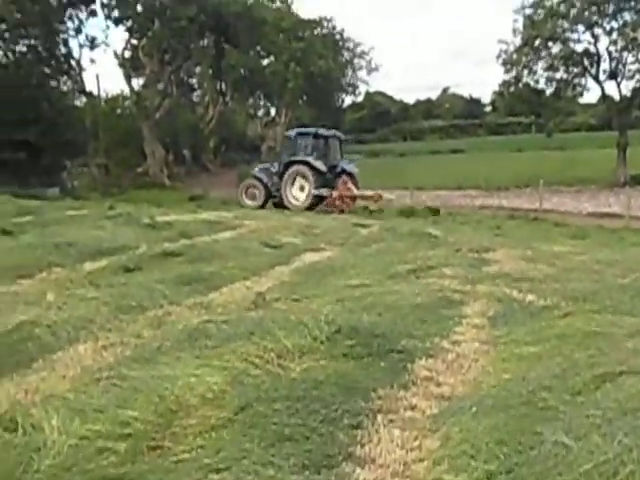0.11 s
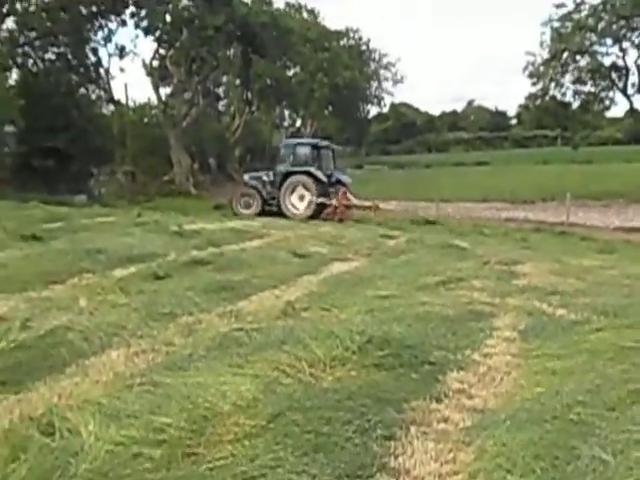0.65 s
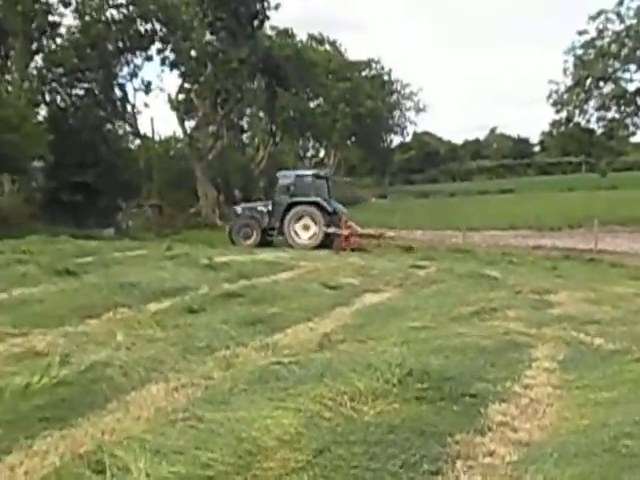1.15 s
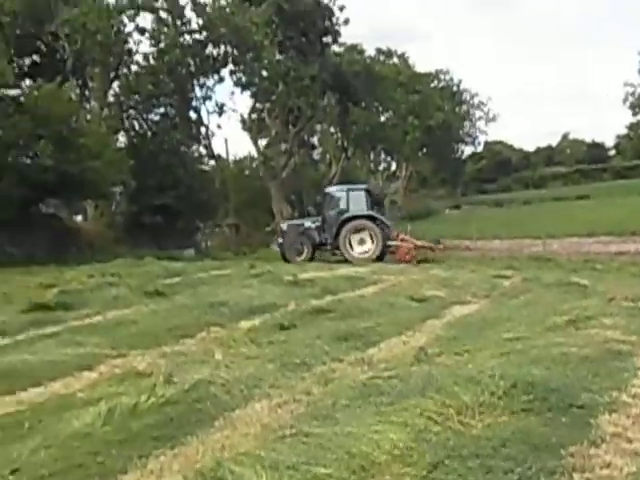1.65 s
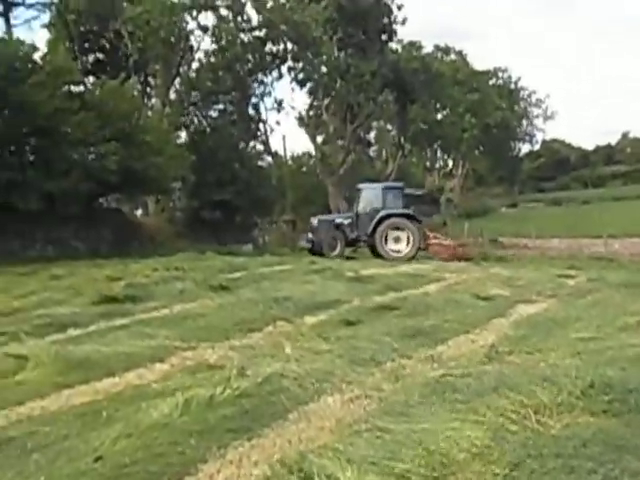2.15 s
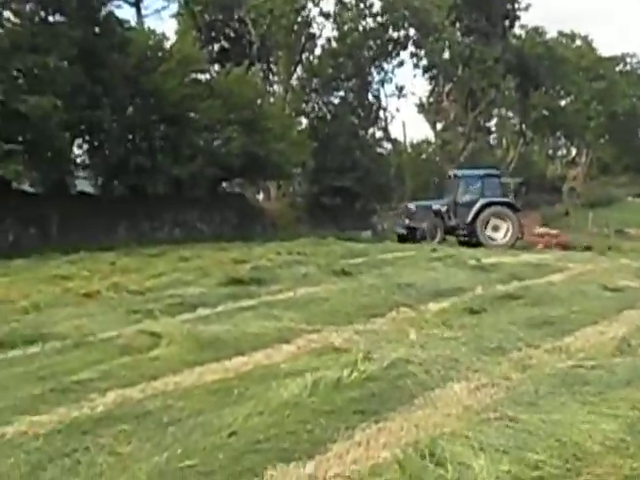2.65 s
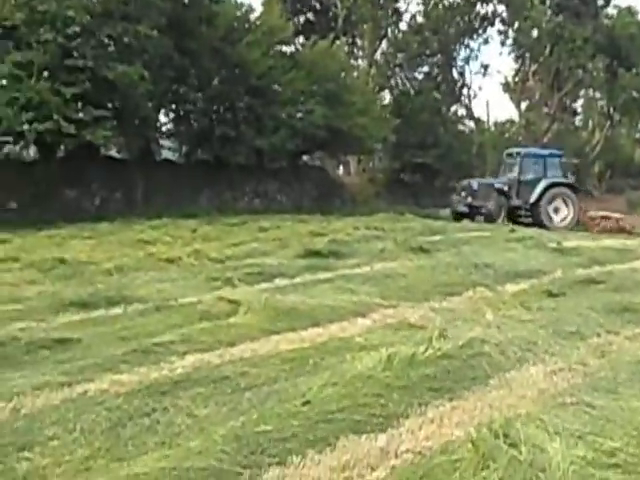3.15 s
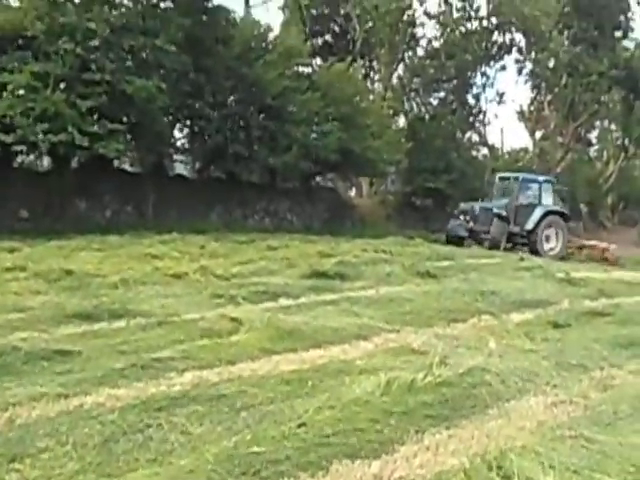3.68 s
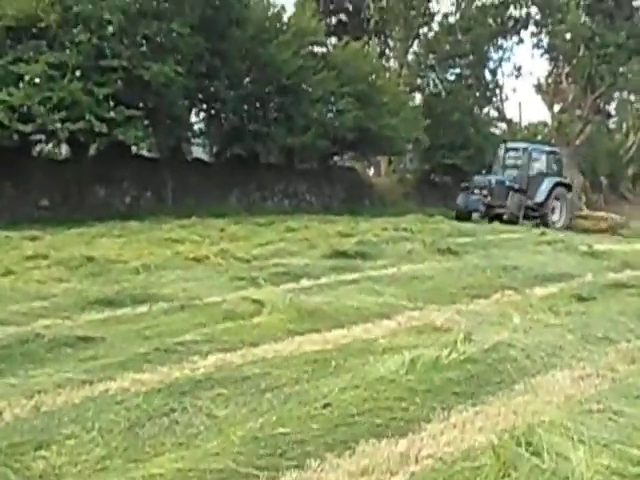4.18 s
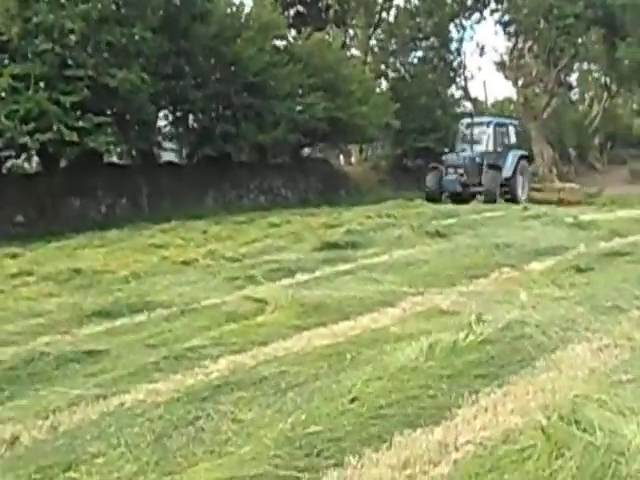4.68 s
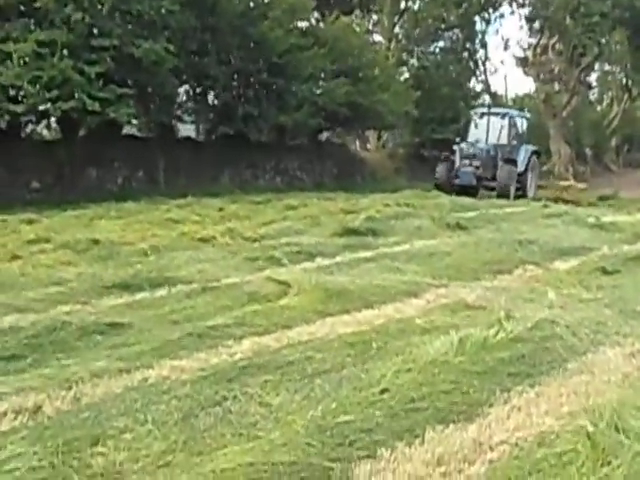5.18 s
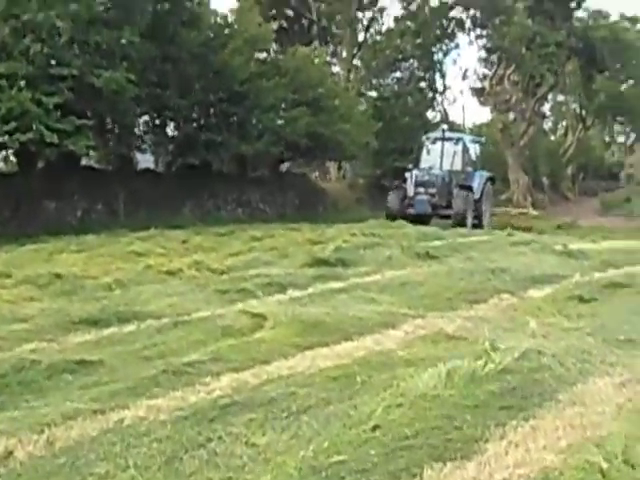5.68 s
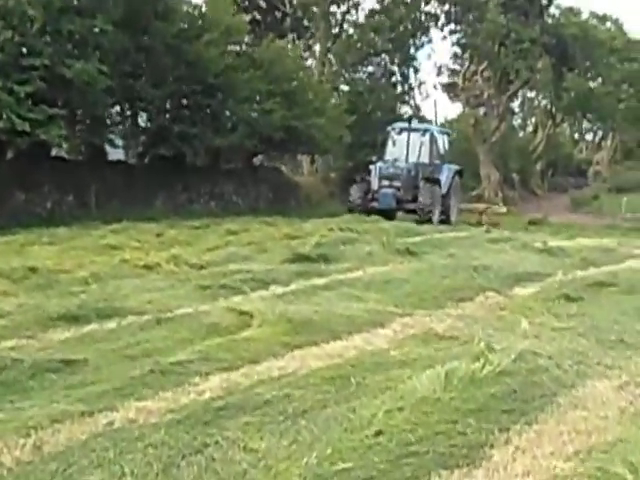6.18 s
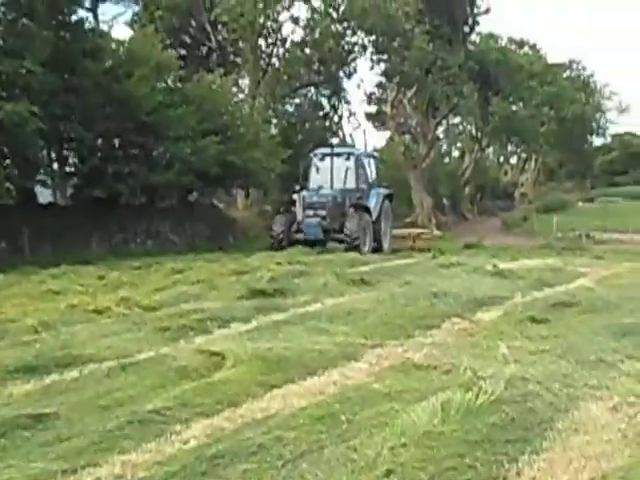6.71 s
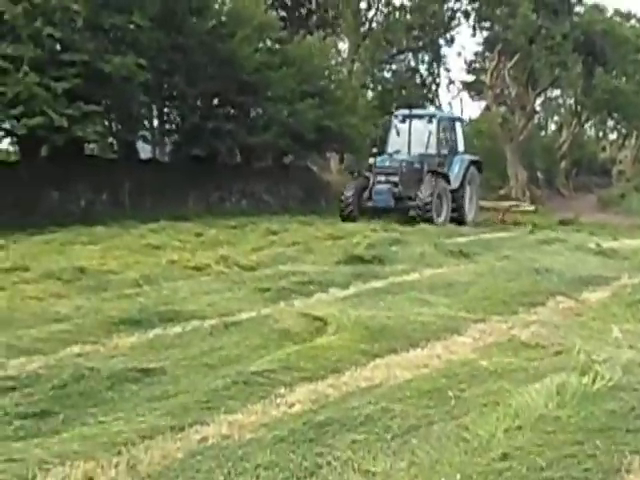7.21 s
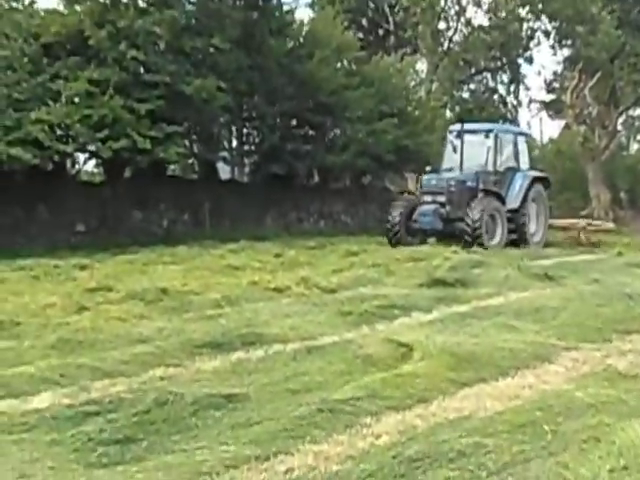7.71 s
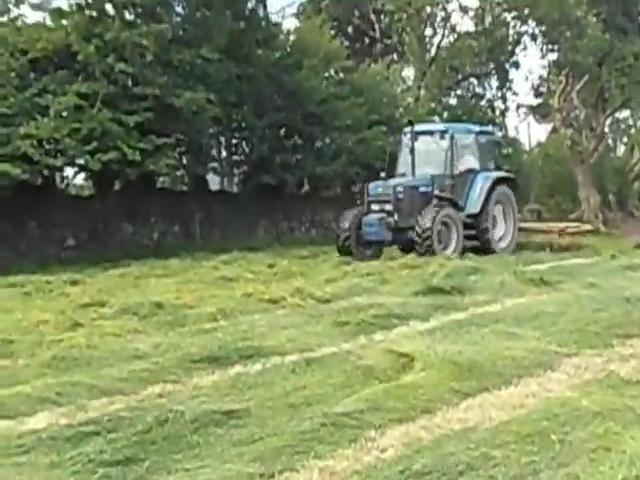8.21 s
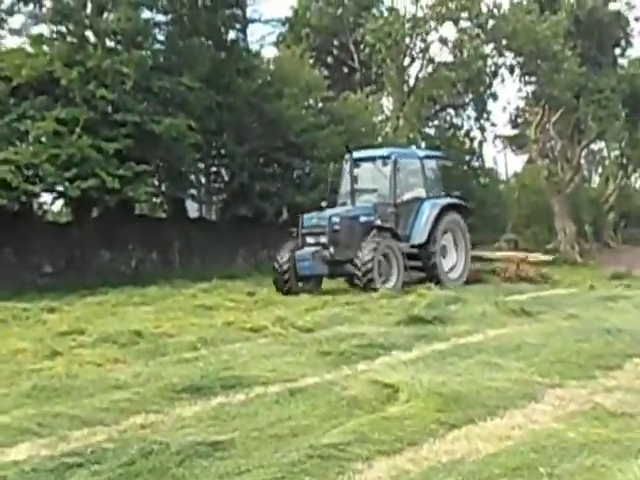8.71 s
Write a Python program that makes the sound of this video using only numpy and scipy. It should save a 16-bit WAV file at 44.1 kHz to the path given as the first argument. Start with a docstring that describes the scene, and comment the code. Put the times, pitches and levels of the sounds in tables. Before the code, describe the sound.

Wind blusters in irregular low thuds and flutter over a steady tractor engine. The engine slows in the first second, knocks along evenly, then quickens midway with a gearbox hum and swells as it approaches across the open field. Two faint squeaks come early, a bright double metal tick late, followed by a thin whine. Cheap handheld microphone, mono, band-limited, distorted by gusts.

```python
"""Tractor and hay machine in wind

A diesel tractor at the far end of a mown field turns, slows, then speeds up and draws nearer.
Firings drive exhaust tones and shaped noise in panel resonances; gears add hum, the hay machine whirr.
Steel clinks and squeaks are brief tones; gusty wind is coloured noise that rumbles and thumps on a
small microphone; the low-rate recorder keeps only a narrow band and clips."""
import sys
import numpy as np
from scipy import signal
from scipy.fft import rfft, irfft, next_fast_len
from scipy.io import wavfile
from scipy.ndimage import uniform_filter1d, map_coordinates

SR = 44100
rng = np.random.default_rng(int(sys.argv[2]) if len(sys.argv) > 2 else 0)


def invert_db(level):
    """Linear amplitude ratio for a level in decibels (20 dB per decade), elementwise."""
    return 10 ** (np.asarray(level, dtype=float) / 20)


def wav_out(sig):
    """Save sig, one row per channel (or a flat mono array), as 16-bit PCM at SR to the path in sys.argv[1]."""
    wavfile.write(sys.argv[1], SR, np.round(np.clip(np.atleast_2d(sig).T, -1, 1) * 32767).astype(np.int16))


N = 390285

# Wind strength. Each row: time in seconds, deep rumble in dB, flutter in dB.
WIND = [(0, -17.5, -25), (1.1, -30, -30.5), (1.9, -23.5, -29.5), (2.2, -33.5, -35), (2.7, -27.5, -31.5),
        (3.4, -27.5, -32), (3.95, -19, -23), (4.15, -35.5, -34.5), (4.45, -29, -36), (5.2, -24, -25),
        (5.45, -32, -32.5), (5.8, -34, -30), (6, -17, -18), (6.35, -23, -24.5), (6.6, -43.5, -30),
        (6.95, -18.5, -18.5), (7.3, -28.5, -25), (8.4, -25.5, -24), (8.85, -24.5, -20)]
# Loudest thumps of wind on the microphone. Each row: centre in seconds, level in dB,
# length in seconds, edge in dB relative to the thump.
THUMPS = [(0.051, -19, 0.0071, 5.5), (0.442, -8.5, 0.0082, -7.5), (0.468, -12.5, 0.03, -11.5),
          (0.502, -13, 0.012, -20), (0.679, -15.5, 0.015, -38), (0.776, -16.5, 0.013, -7),
          (0.914, -15, 0.011, -19), (1.323, -8.5, 0.017, -36), (1.571, -9, 0.021, -11.5),
          (1.657, -12.5, 0.02, -12.5), (1.752, -11, 0.0082, -25), (1.901, -3, 0.0061, -25),
          (2.141, -16.5, 0.016, -31), (2.449, -22, 0.014, -22), (2.555, -19.5, 0.017, -29),
          (2.717, -19.5, 0.011, -23), (2.907, -22, 0.017, -30), (3.095, -24, .012, -31),
          (3.406, -17, 0.018, -25), (3.518, -14.5, 0.0072, -25), (3.743, -10.5, 0.009, -17),
          (3.817, -14, 0.031, -14), (3.873, -14.5, 0.032, -6), (3.94, -10.5, 0.012, -13.5),
          (4.548, -18.5, 0.019, -21), (4.773, -11.5, 0.0093, -21), (4.81, -20.5, 0.0057, -3),
          (4.857, -12, 0.023, -18), (4.9, -14, 0.009, -7.5), (4.995, -19, 0.013, -19),
          (5.035, -24.5, 0.0093, -4), (5.103, -11, 0.012, -13.5), (5.141, -23, .008, -6),
          (5.19, -17.5, 0.02, -13), (5.413, -21.5, .014, -25), (5.947, -11, 0.01, -10),
          (5.977, -17.5, 0.0075, 0), (5.998, -11, 0.038, -5.5), (6.081, -17.5, 0.011, -4.5),
          (6.111, -8.5, 0.022, -22), (6.29, -4.5, 0.0087, -15), (6.338, -16.5, 0.013, -6.5),
          (6.911, -13, 0.01, -31), (6.969, -11, 0.025, -24), (6.996, -7.5, 0.02, -15),
          (7.134, -10.5, .018, -6.5), (7.541, -14.5, 0.0078, -11), (7.76, -15.5, 0.045, -21),
          (8.563, -15, 0.016, -19), (8.727, -11, .016, -17), (8.758, -12, 0.018, -12),
          (8.796, -13.5, 0.0078, -19)]
# Wind spectra, of which only the shape counts. Each row: frequency in Hz, density in dB per Hz.
RUMBLE_SPECTRUM = [(8, -24), (20, -2.5), (40, 3.5), (70, -4.5), (140, -21), (300, -76.5)]
FLUTTER_SPECTRUM = [(30, -15.5), (80, 0.5), (150, -1.5), (250, -7.5), (350, -16), (500, -33), (1200, -72.5)]
EDGE_SPECTRUM = [(150, -29.5), (330, 5), (500, -5.5), (750, -13.5), (1200, -26.5), (2500, -66)]
WAKE_DB, WAKE_S = -10, 0.04  # flutter trailing each thump: level relative to it, decay time

# Recorder response: low sample rate, steep cutoff with faint images above.
# Each row: frequency in Hz, gain in dB.
RECORDER_RESPONSE = [(5050, 0), (5500, -13.5), (5750, -12.5), (6050, -19), (6350, -46), (7000, -110)]

# Faint squeaks of metal on metal. Each row: centre in seconds, frequency in Hz, level in dB.
SQUEAKS = [(.559, 2170, -41), (.661, 2170, -41.5)]
SQUEAK_S = 0.032

# A stone or tine strikes steel. Each row: start in seconds, level in dB.
CLINKS = [(8.1083, -1), (8.1098, 0)]
# Ringing modes of the steel. Each row: frequency in Hz, mean level in dB, T60 in seconds.
STEEL_MODES = [(2920, -7, 0.013), (3480, -6, 0.013), (3880, -8, 0.015), (4550, -6.5, 0.008)]
CRACK_DB, CRACK_T60_S = -4.5, 0.024  # bare snap of each strike: level relative to it, decay

# Engine speed. Each row: time in seconds, mean firing rate in Hz.
FIRING_RATE = [(0, 57), (.55, 56.5), (.9, 49.5), (1.5, 48.6), (3.55, 48.2), (4.6, 49.3), (5.35, 54.2),
               (6.83, 56.4), (8.45, 56.97), (8.85, 54.2)]
# Tractor as heard. Each row: time in seconds, clatter in dB, aspect (0 side-on, 1 head-on,
# 2 close and turning away; limited to 0-2), share of knocks against whirr from 0 to 1.
TRACTOR = [(0, -31, 1.2, 0.4), (.9, -34.5, -0.15, 0.35), (2.3, -31, 0.5, 0.49), (3.2, -28.5, 0, 0.56),
           (4.2, -28.5, 1.44, 0.61), (5, -25, 1.1, 0.56), (6, -24, 1.1, 0.46), (7, -22.5, 1.5, 0.53),
           (7.9, -20, 1.8, 0.36), (8.85, -22, 2.5, 0.34)]
# Gearbox hum, joined by an equal tone an octave below.
# Each row: time in seconds, frequency in Hz, mean level in dB over the clatter.
GEARS = [(0, 278, -16), (4.3, 280.2, -16.5), (4.9, 282.5, -12), (5.5, 295, -15.5), (6.6, 301.4, -14),
         (7.7, 297.3, -16), (8.85, 295.6, -24.5)]
# Whine that comes out as the tractor turns close by. Each row: time in seconds, mean level in dB.
WHINE = [(6, -56.5), (7.8, -43.5), (8.3, -37.5), (8.7, -32.5), (8.85, -36)]
WHINE_MULTIPLE = 12.15  # of the firing rate

# Exhaust tones. Each row: multiple of the firing rate, mean relative level in dB.
EXHAUST_ORDERS = [(.5, -11), (1, 0), (2, -12.5), (3, -4.5), (4, -9.5), (5, -18)]
EXHAUST_DB = -7  # over the clatter, when that is at its mean dB
EXHAUST_GROWS = 0.6  # share of the clatter's rise in dB that the exhaust follows
# Resonances of block, bonnet and machine. Each row: frequency in Hz, half width in Hz,
# relative level in dB side-on, head-on and close.
PANELS = [(352, 120, -12, -12, -10), (588, 54, -8.5, -12, -7.5), (800, 135, -1.5, -3, -2),
          (1190, 98, -2.5, -5, -6), (1427, 136, -2.5, 1, -1.5), (1722, 150, -1, -6.5, -4.5),
          (2093, 145, -4.5, -3, -4), (2336, 90, -4.5, -2.5, -11), (2690, 216, -5, -1.5, -6.5),
          (3135, 240, -7, -5.5, -10.5), (3520, 100, -6.5, -6, -6), (3800, 85, -11, -2.5, -10),
          (4227, 216, -8.5, -9.5, -12.5), (4913, 390, -9, -12, -14.5), (5970, 500, -12.5, -19, -21.5)]
# Clatter treble, swelling and fading as the tractor turns. Each row: time in seconds, gain in dB.
TREBLE = [(0, -0.65), (1.2, 0.18), (2.2, -1.3), (3, 0.95), (4.4, 3.1), (4.9, -1), (6.8, 0), (8.85, -0.21)]
TREBLE_EDGE_HZ = 3100
# Ring of every second firing. One row: frequency in Hz, half width in Hz.
TAPPET_RING = (2650, 120)
TAPPET_DB = -13  # over the clatter, before the knock share scales it


def unit(x):
    """Brings x to rms 1."""
    return x / np.sqrt(np.mean(x ** 2) + 1e-20)


def curves(rows):
    """One value per sample for each column after the time."""
    s, *cols = np.transpose(rows)
    return [np.interp(np.arange(N) / SR, s, col) for col in cols]


def wobble(rate_hz):
    """Smooth random curve with rate_hz knots a second."""
    knots = rng.standard_normal(int(N * rate_hz / SR) + 4)
    return map_coordinates(knots, [np.arange(N) * rate_hz / SR])


def coloured(x, response):
    """x filtered by a gain that depends on frequency."""
    m = next_fast_len(N + 8192)
    return irfft(rfft(x, m) * response(np.fft.rfftfreq(m, 1 / SR)), m)[..., :N]


def slope(points):
    """Gain through (Hz, dB) points on a log frequency axis."""
    hz, db = np.transpose(points)
    return lambda f: invert_db(np.interp(np.log(f + 1), np.log(hz + 1), db))


def shaped_noise(points):
    """White noise coloured through (Hz, dB) points, rms 1."""
    return unit(coloured(rng.standard_normal(N), slope(points)))


def tone(cycles):
    """Sine of rms 1 from a running count of cycles, its phase shaken by gusty air."""
    return np.sqrt(2) * np.sin(2 * np.pi * (cycles + rng.random() + 0.053 * wobble(14)))


def patchy(flicker_db, drift_db):
    """White noise whose narrow bands flicker and drift, as moving air and a turning source make them."""
    z = signal.stft(rng.standard_normal(N + 512), nperseg=512)[2]

    def field(frames):
        across = uniform_filter1d(rng.standard_normal(z.shape), size=3, axis=0)
        return unit(uniform_filter1d(across, size=frames, axis=1))

    gain = invert_db(flicker_db * field(14) + drift_db * field(90))
    return unit(signal.istft(z * gain, nperseg=512)[1][:N])


def wind():
    """Eddies press on the membrane: lumpy rumble and flutter, and thumps with sharper, higher edges."""
    rumble_db, flutter_db = curves(WIND)
    lumps, flicks = wobble(22), wobble(70)
    rumble = invert_db(rumble_db) * unit(invert_db(3.3 * wobble(11)) * shaped_noise(RUMBLE_SPECTRUM))
    gusts = shaped_noise(FLUTTER_SPECTRUM) + invert_db(-19 + 1.8 * flicks) * shaped_noise(EDGE_SPECTRUM)
    flutter = invert_db(flutter_db) * unit(invert_db(3.8 * lumps + 2.5 * flicks) * gusts)
    return thumps(rumble + flutter)


def thumps(out):
    """Adds bell-shaped bursts of flutter, each with an edge bunched at the crest and a decaying wake."""
    thud, edge = shaped_noise(FLUTTER_SPECTRUM), shaped_noise(EDGE_SPECTRUM)
    trail = unit(invert_db(2.6 * wobble(70)) * shaped_noise(FLUTTER_SPECTRUM))
    for s, db, length_s, edge_db in THUMPS:
        span = slice(max(round((s - 0.15) * SR), 0), round((s + 0.2) * SR))
        t = np.arange(N)[span] / SR - s
        bell = np.exp(-2 * (t / length_s) ** 2)
        energy = np.sum(bell ** 2)
        body = bell * thud[span]
        crest = bell ** 3 * edge[span]
        # both parts scaled to the energy of the bell
        body = body * np.sqrt(energy / np.sum(body ** 2))
        crest = crest * np.sqrt(energy / np.sum(crest ** 2))
        wake = (t > 0) * (1 - bell) * np.exp(-abs(t) / WAKE_S) * trail[span]
        out[span] += invert_db(db) * (body + invert_db(edge_db) * crest + invert_db(WAKE_DB) * wake)
    return out


def squeaks():
    """Metal rubs on metal: brief wavering tones with soft ends."""
    out = np.zeros(N)
    for s, hz, db in SQUEAKS:
        t = np.arange(N) / SR - s
        fade = np.exp(-(2 * t / SQUEAK_S) ** 4)
        out += invert_db(db) * fade * tone(np.cumsum(hz + 70 * wobble(140)) / SR)
    return out


def clinks():
    """Struck steel: decaying modes and a bright noise snap."""
    out, t = np.zeros(N + SR), np.arange(SR // 10) / SR
    snap = unit(coloured(np.diff(rng.standard_normal(N + 2), n=2), slope(RECORDER_RESPONSE)))
    for s, db in CLINKS:
        start = round(s * SR)
        ring = np.zeros(len(t))
        for hz, mode_db, t60_s in STEEL_MODES:
            decay = invert_db(mode_db + rng.normal(0, 2.8) - 60 * t / t60_s)
            ring += decay * np.sin(2 * np.pi * (hz * t + rng.random()))
        crack = invert_db(CRACK_DB - 60 * t / CRACK_T60_S) * snap[start:][:len(t)]
        attack = 1 - np.exp(-t / 0.000095)
        out[start:][:len(t)] += invert_db(db) * (ring + crack) * attack
    return out[:N]


def driveline(fired, clatter_db):
    """Gear teeth hum and something whines; the tones waver in strength."""
    hz, db = curves(GEARS)
    teeth = np.cumsum(hz) / SR
    hum = invert_db(clatter_db + db + 2.5 * wobble(16)) * (tone(teeth) + tone(teeth / 2))
    whine = invert_db(curves(WHINE)[0] + 2.2 * wobble(18)) * tone(WHINE_MULTIPLE * fired)
    return hum + whine


def panel_gain(f):
    """Gain of the panel resonances for each of the three aspects; their powers add."""
    power = 0
    for hz, half_width_hz, *db in PANELS:
        power = power + invert_db(np.array(db)[:, None]) ** 2 / (1 + ((f - hz) / half_width_hz) ** 4)
    return np.sqrt(power)


def panel_clatter(source, aspect):
    """Panels colour the source; the colour fades from one aspect to the next as the tractor turns."""
    parts = np.clip(1 - abs(np.clip(aspect, 0, 2) - np.arange(3)[:, None]), 0, 1)
    views = coloured(source, panel_gain)
    clatter = sum(part * unit(view) for part, view in zip(parts, views))
    treble = coloured(clatter, lambda f: 1 / (1 + (TREBLE_EDGE_HZ / (f + 1)) ** 8))
    return clatter + (invert_db(curves(TREBLE)[0]) - 1) * treble


def engine(fired, clatter_db, aspect, share):
    """Each firing puffs through the exhaust and knocks the block; fan and machine add steady whirr."""
    exhaust = sum(invert_db(db + 2.5 * wobble(3.345)) * tone(k * fired) for k, db in EXHAUST_ORDERS)
    exhaust_db = EXHAUST_DB + (EXHAUST_GROWS - 1) * (clatter_db - clatter_db.mean())
    stroke = fired.astype(int)
    odd = stroke % 2
    chance = rng.standard_normal((stroke[-1] + 1, 2))[stroke]
    phase = fired - stroke
    knock = (1 - np.exp(-phase / 0.063)) * np.exp(-phase / 0.37)
    # cylinders differ: every second knock is weaker, and each varies by chance
    bursts = unit(invert_db(-2.5 * (1 - odd) + 2.0 * chance[:, 0]) * knock)
    whirr = np.sqrt(np.clip(1 - share ** 2, 0, 1))
    source = (share * bursts + whirr) * patchy(flicker_db=0.2, drift_db=1.16)
    clatter = panel_clatter(source, aspect)
    ring_hz, half_width_hz = TAPPET_RING
    taps = odd * invert_db(6.3 * chance[:, 1]) * knock * rng.standard_normal(N)
    tappet = unit(coloured(taps, lambda f: 1 / (1 + ((f - ring_hz) / half_width_hz) ** 2)))
    return invert_db(clatter_db) * (clatter + invert_db(exhaust_db) * exhaust + invert_db(TAPPET_DB) * share * tappet)


def tractor():
    """Engine and driveline on one running count of firings, whose rate wavers slightly."""
    fired = np.cumsum(curves(FIRING_RATE)[0] * (1 + 0.00399 * wobble(6))) / SR
    clatter_db, aspect, share = curves(TRACTOR)
    return engine(fired, clatter_db, aspect, share) + driveline(fired, clatter_db)


def scene():
    """Wind on the microphone, squeaks and clinks, and the tractor; one channel."""
    return (wind() + squeaks() + clinks() + tractor())[None]


def top_cut(x):
    """Nothing passes above the cut-off."""
    return signal.sosfilt(signal.butter(12, 15800, fs=SR, output="sos"), x)


def record(dry):
    """The low-rate recorder clips and keeps a narrow band; what still overshoots is clipped once more."""
    x = coloured(np.clip(dry, -0.74, 0.74), slope(RECORDER_RESPONSE))
    x = np.clip(x, -0.715, 0.715) - 0.0027  # small DC offset
    return top_cut(x)


dry = scene()
out = record(dry)
wav_out(out)
```